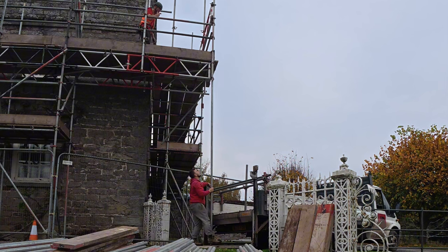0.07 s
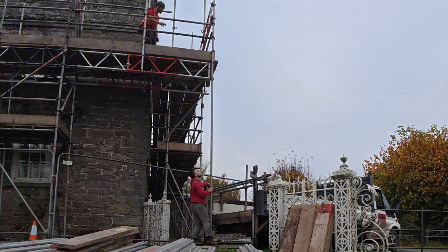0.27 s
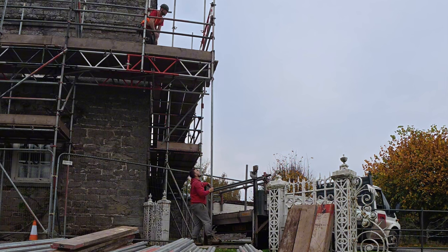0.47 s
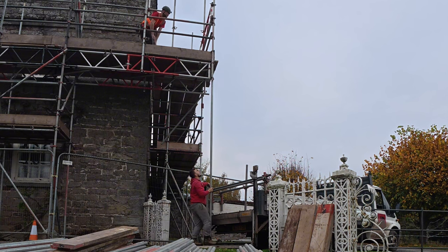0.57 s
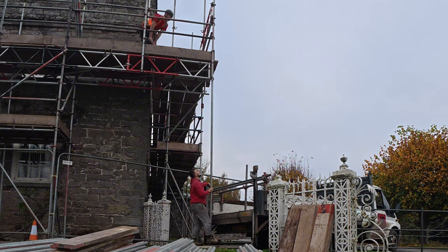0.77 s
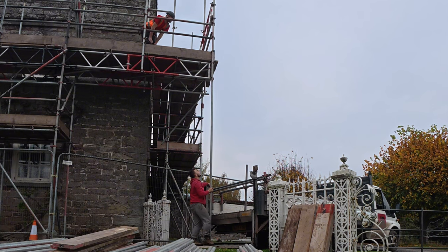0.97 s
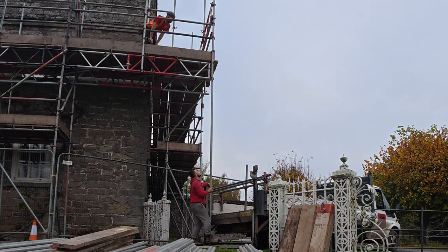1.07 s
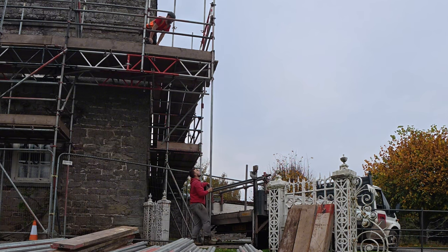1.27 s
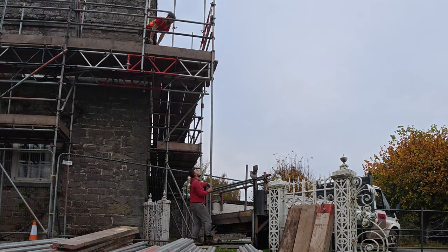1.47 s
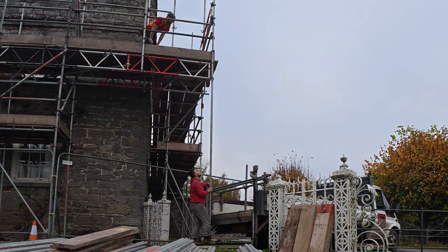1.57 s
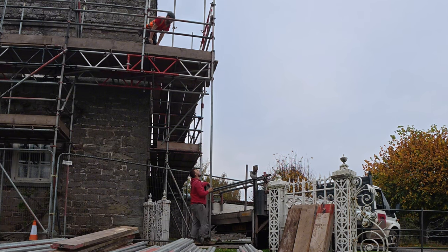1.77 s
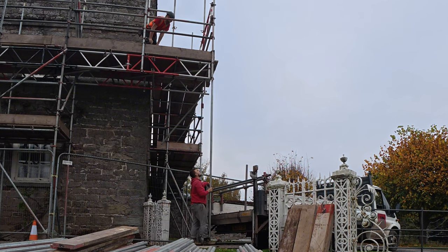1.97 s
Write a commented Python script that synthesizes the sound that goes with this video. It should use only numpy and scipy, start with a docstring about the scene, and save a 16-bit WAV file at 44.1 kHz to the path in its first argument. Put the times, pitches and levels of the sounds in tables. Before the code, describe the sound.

Hammering on scaffold tubes outdoors: sharp metallic clangs about three a second, with loose fittings rattling

```python
"""A hammer drives a fitting on a steel scaffold, about three blows a second.
Most blows add bright, shaped noise of steel contact to the clang of the fitting going home: a short crack,
a dense wash of decaying noise, and sine modes of the frame and the tube walls. Loose fittings knock, small parts
ping, deck boards thud and one tick falls late, all as enveloped noise, the knocks with tube modes added.
A faint late echo comes off the buildings, over low outdoor noise."""
import sys
import numpy as np
from scipy import signal
from scipy.fft import rfft, irfft
from scipy.io import wavfile

SR = 44100
rng = np.random.default_rng(int(sys.argv[2]) if len(sys.argv) > 2 else 0)


def wrap_up_sound(samples):
    """Save the sound to the file named by the first command line argument, as 16-bit audio."""
    columns = np.atleast_2d(samples).T
    # keep every value between -1 and 1, then stretch to whole-number steps
    tamed = np.clip(columns, -1, 1)
    steps = np.round(tamed * 32767).astype(np.int16)
    wavfile.write(sys.argv[1], SR, steps)


N = 88420  # length of the scene in samples
EVENT_SIZE = 30000  # length of one struck sound in samples

# modes of the tube wall: [f/Hz, level/dB, t60/s before the length factor]
TUBE_MODES = [(3481, 0, .385), (3525, 3.5, .28), (3549, -6, .22), (3596, -4, .27), (3665, -4, .21),
              (3727, -1, .22), (3868, -1.5, .22), (3991, -3, .2), (4778, -2, .19), (5007, -5, .18),
              (6221, -3, .19), (7013, -6, .18), (7213, -7, .18), (7505, -9, .17), (8409, -11, .15),
              (9770, -16, .21), (9890, -18, .18)]
TUBE_DB = -14.5  # added to the tube level of each blow or knock


def undb(db):
    """Turn decibels into gain."""
    return 10 ** (np.asarray(db) / 20)


def along(table, hz):
    """Read (Hz, value) points on a log-frequency axis."""
    points = np.array(table, float)
    return np.interp(np.log(hz + 1e-9), np.log(points[:, 0]), points[:, 1])


def bins(size=EVENT_SIZE):
    """Frequencies of the spectrum in Hz."""
    return np.arange(size // 2 + 1) * SR / size


def noise(db, size=EVENT_SIZE):
    """Random-phase noise of rms 1 with the given spectrum in dB."""
    phase = 2 * np.pi * rng.random(size // 2 + 1)
    x = irfft(undb(db) * np.exp(1j * phase), size)
    return x / np.std(x)


def hump(hz, octaves):
    """Spectrum of a broad resonance in dB, 3.5 dB down at the given octaves to either side."""
    distance = np.log2((bins() + 1) / hz) / octaves
    return -20 * np.log10(1 + distance ** 4 / 2)


def strike(rise, t60):
    """Envelope that swells with a time constant in s and loses 60 dB in each t60."""
    age = np.arange(EVENT_SIZE) / SR
    swell = 1 - np.exp(-np.minimum(age / max(rise, 1e-5), 30))
    decay = np.exp(-np.minimum(np.log(1000) * age / t60, 30))
    return swell * decay


def walk(seconds, size=EVENT_SIZE):
    """Random curve: straight lines between unit-normal points spaced by the given seconds."""
    steps = np.arange(size) / SR / max(seconds, 1e-3)
    return np.interp(steps, np.arange(1024), rng.standard_normal(1024))


def add(track, start, sound):
    """Mix a sound into the track at its time, trimmed to the track."""
    first = int(round(start * SR))
    lo, hi = max(first, 0), min(first + len(sound), N)
    track[lo:hi] += sound[lo - first:hi - first]


def hammer():
    """The hard click of the hammer face and the sizzle that it sends along the steel."""
    # hammer meets steel: [t/s, sizzle level/dB, click level/dB, sizzle body below 3 kHz/dB, sizzle rise/s]
    contacts = [(0.2934, -13.5, -35.5, 3, 0.013), (0.3213, -30.5, -27.5, 3.5, .0004),
                (0.6086, -16, -10, -10.5, 0.0016), (1.3176, -14.5, -13.5, -3, 0.003)]
    # sizzle of the hammer face on steel: [f/Hz, relative level/dB]
    face = [(100, -6.5), (1000, -8), (2200, -11), (3200, -20), (4200, -10), (7300, -9), (9200, -17.5),
            (10000, -11.5), (12000, -24.5), (15500, -44)]
    sizzle_t60_s, click_t60_s = 0.11, 0.007
    click_hz, click_octaves = 7340, 0.19
    out = np.zeros(N)
    for start, sizzle_db, click_db, body_db, rise in contacts:
        body = along([(3000, body_db), (4200, 0)], bins())
        sizzle = noise(along(face, bins()) + body) * strike(rise, sizzle_t60_s)
        add(out, start, undb(sizzle_db) * sizzle)
        click = noise(hump(click_hz, click_octaves)) * strike(0, click_t60_s)
        add(out, start, undb(click_db) * click)
    return out


def blows(steel):
    """The fitting goes home with a crack and sets frame and tube ringing."""
    # fitting goes home: [t/s, overall level/dB, bass/dB, middle/dB, treble/dB, tube ring/dB,
    # length factor, crack/dB]
    hits = [(-.09, -15, 0.5, -6, 8, 5, 0.91, 22), (0.3202, -20.5, 4, 1, 7.5, 2.5, 0.91, 3),
            (0.6193, -17, 4.5, 2, 3.5, 1, 1, 1.5), (0.9622, -13, -13.5, 0.5, 7, -1.5, 1.0, 2.5),
            (1.336, -14.5, -5, 0.5, 9, 3, 0.94, -5.5)]
    # modes of the frame: [f/Hz, level/dB, t60/s before the length factor]
    frame_modes = [(131, -8, .42), (217, 1, .46), (243, 1, .46), (410, -3, .4), (565, -7, .3),
                   (593, 1, .38), (862, -3, .28), (1026, 1, .22), (1125, -5, .24), (1211, -3, .25),
                   (1375, -2, .24), (1472, -7, .22), (1915, -10, .24), (2020, -9, .24)]
    frame_db = -11  # added to the middle level of each blow
    frame_rise_s, tube_rise_s = 0.0034, 0.0011
    out = np.zeros(N)
    for start, db, bass_db, middle_db, treble_db, tube_db, length, crack_db in hits:
        frame = undb(frame_db + middle_db) * ring(frame_modes, frame_rise_s, length)
        tube = undb(TUBE_DB + tube_db) * ring(TUBE_MODES, tube_rise_s, length)
        wash = clang(steel, bass_db, middle_db, treble_db, length)
        add(out, start, undb(db) * (undb(crack_db) * crack() + wash + frame + tube))
    return out


def crack(tone_db=0, rise=0):
    """The short noise burst as steel lands on steel; a soft landing blunts it."""
    # first crack of a clang: [f/Hz, relative level/dB]
    colour = [(150, -8.5), (600, -12.5), (1300, 12), (2900, -16), (3800, -6), (5200, -12.5), (7200, -8.5),
              (8500, -26.5), (15500, -37.5)]
    rise_s, t60_s = 0.00031, 0.059  # the landing's own rise adds to this one
    return noise(along(colour, bins()) + tone_db) * strike(rise_s + rise, t60_s)


def scaffold():
    """Spectrum of the steelwork in dB, with fine peaks and dips that every blow and knock shares."""
    # dense clang of the scaffold: [f/Hz, relative level/dB]
    steelwork = [(30, -44), (65, -3.5), (130, 3.5), (300, 4), (590, 9), (730, 4.5), (1000, 4.5),
                 (1400, 3.5), (2200, -1.5), (3330, -5), (3560, 4.5), (4400, -7), (6000, -4.5),
                 (7300, -12.5), (8000, -26.5), (9500, -20), (9850, -17), (11000, -36.5), (12500, -41.5),
                 (15500, -47.5)]
    ripple_db, ripple_hz = 2.5, 45  # spread and spacing of the peaks and dips
    hz = bins()
    marks = np.arange(0, SR / 2, ripple_hz)
    ripple = ripple_db * np.interp(hz, marks, rng.standard_normal(len(marks)))
    return along(steelwork, hz) + ripple * np.minimum(hz / 1500, 1)  # smoother below 1.5 kHz


def clang(steel, bass_db, middle_db, treble_db, length, rise=0):
    """Countless modes and reflections as noise, each band with its own swell and decay; bass rings on."""
    # swell and decay of the clang: [f/Hz, rise/s before any added rise, t60/s before the length factor]
    bands = [(82, 0.014, 0.79), (223, 0.036, 0.57), (585, 0.0032, 0.31), (1230, 0.0084, 0.21),
             (2386, 0.00025, 0.21), (3600, 0.0015, 0.25), (5300, 0.0018, 0.17), (12000, 0.0045, .2)]
    rattle_db, rattle_s = -0.5, 0.0029  # random unevenness of level and the spacing of its points
    hz = bins()
    tone = along([(250, bass_db), (700, middle_db), (1800, middle_db), (5500, treble_db)], hz)
    spectrum = rfft(noise(steel)) * undb(tone)
    centres, pitch = np.log([row[0] for row in bands]), np.log(hz + 1)
    out = 0
    for share, (_, swell, t60) in zip(np.eye(len(bands)), bands):
        weight = np.interp(pitch, centres, share)  # neighbouring bands crossfade
        out = out + irfft(spectrum * weight) * strike(swell + rise, t60 * length)
    return out * undb(rattle_db * walk(rattle_s))


def ring(modes, rise, length):
    """Struck sine modes; reflections make each one waver in level and phase."""
    level_waver, phase_wander_rad, waver_s = 0.36, 0.45, 0.024
    t, out = np.arange(EVENT_SIZE) / SR, 0
    for hz, db, t60 in modes:
        phase = 2 * np.pi * (hz * t + rng.random()) + phase_wander_rad * walk(waver_s)
        tone = undb(db) * np.sin(phase.astype(np.float32))
        waver = 1 + level_waver * walk(waver_s)
        out = out + tone * waver * strike(rise, t60 * length)
    return out


def knocks(steel):
    """Duller clanks of loose fittings, which reach only the lower tube modes."""
    # loose fittings knock: [t/s, overall level/dB, treble/dB, tube ring/dB, rise/s, crack/dB]
    # the tube rises as listed, the clang adds the whole rise to its own and the crack adds half
    clanks = [(0.113, -49, -26, 3.5, 0.0061, 0), (.458, -40, 5, -7.5, 0.023, -13.5),
              (.757, -28, -19, -15.5, 0.0046, -5.5), (0.772, -30, -4, -3.5, 0.0008, 3),
              (.947, -10, -10.5, -5.5, 0.022, -10.5), (1.076, -24, -8.5, -1, 0.0044, -5),
              (1.093, -37.5, 1, -15, 0.0015, 9.5), (1.363, -20, -4, -1, 0.0016, -0.5),
              (1.402, -28.5, 2.5, 7, 0.0045, 6), (1.63, -54.5, -5, -8, 0.007, 4)]
    bass_db, top_db, length = -5.5, -10.5, 0.99  # length is a factor on the decay times
    out = np.zeros(N)
    dull = along([(7400, 0), (8200, top_db)], bins())
    low_modes = [mode for mode in TUBE_MODES if mode[0] < 4200]
    for start, db, treble_db, tube_db, rise, crack_db in clanks:
        tube = undb(TUBE_DB + tube_db) * ring(low_modes, rise, length)
        burst = undb(crack_db) * crack(dull, rise / 2)
        wash = clang(steel + dull, bass_db, 0, treble_db, length, rise)
        add(out, start, undb(db) * (burst + wash + tube))
    return out


def pings():
    """Small steel parts ring briefly, each as a band of noise like a cluster of modes."""
    # small steel parts ping: [t/s, level/dB, centre f/Hz, width/Hz, t60/s]
    parts = [(0.298, -29.5, 10100, 270, 0.037), (0.456, -54, 1500, 100, 0.4),
             (0.621, -13, 4500, 1300, 0.093), (.758, -45.5, 2020, 50, 0.41), (1.4, -49, 7100, 324, 0.086),
             (.772, -36.5, 1300, 75, .16), (0.782, -34, 3850, 546.6, 0.14),
             (1.096, -28.5, 1610, 930, 0.067), (1.336, -11.5, 3900, 700, 0.075),
             (1.512, -49.5, 3472, 40, 0.17), (.969, -16.5, 1007, 70.3, 0.11),
             (1.906, -54, 2105, 278.6, 0.025)]
    rise_s = 0.00019
    out = np.zeros(N)
    for start, db, hz, width, t60 in parts:
        octaves = np.log2(1 + width / hz / 2)  # half the width, above the centre
        add(out, start, undb(db) * noise(hump(hz, octaves)) * strike(rise_s, t60))
    return out


def boards():
    """The deck boards jump and thud on the frame, each thud a broad low hump of noise."""
    # deck boards thud: [t/s, level/dB, centre f/Hz]
    thuds = [(0.022, -37, 198), (0.257, -43.5, 97.2), (0.296, -23, 151), (0.3, -27, 381),
             (0.459, -38.5, 303), (0.608, -26, 180.3), (0.636, -22, 235), (.762, -30, 220.3),
             (0.947, -19.5, 150), (.985, -21.5, 560), (1.019, -20, 243), (1.099, -29, 261.4),
             (1.322, -22.5, 174.8), (1.401, -21, 406), (1.667, -45.5, 265), (1.965, -61, 505)]
    octaves, rise_s, t60_s = 0.76, 0.0035, 0.21
    out = np.zeros(N)
    for start, db, hz in thuds:
        add(out, start, undb(db) * noise(hump(hz, octaves)) * strike(rise_s, t60_s))
    return out


def tick():
    """A small hard object ticks once: a short, dry band of noise."""
    start_s, level_db = 1.9065, -64.5
    centre_hz, octaves, t60_s = 3570, 0.48, 0.032
    out = np.zeros(N)
    add(out, start_s, undb(level_db) * noise(hump(centre_hz, octaves)) * strike(0, t60_s))
    return out


def site(sound):
    """The buildings around send back a faint, dull wash: the sound convolved with decaying noise."""
    # colour of the late echo: [f/Hz, relative level/dB]
    colour = [(100, -0.5), (1000, -0.5), (3600, -9), (6000, -14.5), (12000, -26.5)]
    level_db, rise_s, t60_s = -47, 0.07, 1.6
    age = np.arange(N) / SR
    envelope = (1 - np.exp(-age / rise_s)) * np.exp(-np.log(1000) * age / t60_s)
    tail = noise(along(colour, bins(size=N)), size=N) * envelope
    return undb(level_db) * signal.fftconvolve(sound, tail / np.linalg.norm(tail))[:N]


def air():
    """Distant rumble and hiss: shaped noise whose level wavers at random."""
    # outdoor background: [f/Hz, relative level/dB]
    colour = [(25, -35.5), (50, -26.5), (80, 7.5), (115, -4.5), (180, 1.5), (400, -8.5), (800, -8.5),
              (1400, -13), (2500, -25.5), (5000, -33.5), (9000, -39), (15500, -44.5)]
    level_db, swell_db, swell_s = -60, -4, 0.05  # level, its random swing and the spacing of its points
    level = undb(level_db + swell_db * walk(swell_s, size=N))
    return level * noise(along(colour, bins(size=N)), size=N)


def scene():
    """All the work on the scaffold with its late echo, over the outdoor background."""
    steel = scaffold()
    work = hammer() + blows(steel) + knocks(steel) + pings() + boards() + tick()
    return (air() + work + site(work))[None]


def record(dry):
    """A high-pass thins the deepest bass, tanh rounds the peaks and a steep low-pass cuts the top."""
    low_cut_hz, top_hz = 61, 15900
    bass_cut = signal.butter(2, low_cut_hz, "highpass", fs=SR, output="sos")
    rounded = np.tanh(signal.sosfilt(bass_cut, dry))
    top_cut = signal.ellip(8, .2, 80, top_hz, fs=SR, output="sos")  # 0.2 dB ripple, 80 dB stopband
    return signal.sosfilt(top_cut, rounded)


dry = scene()
out = record(dry)
wrap_up_sound(out)
```